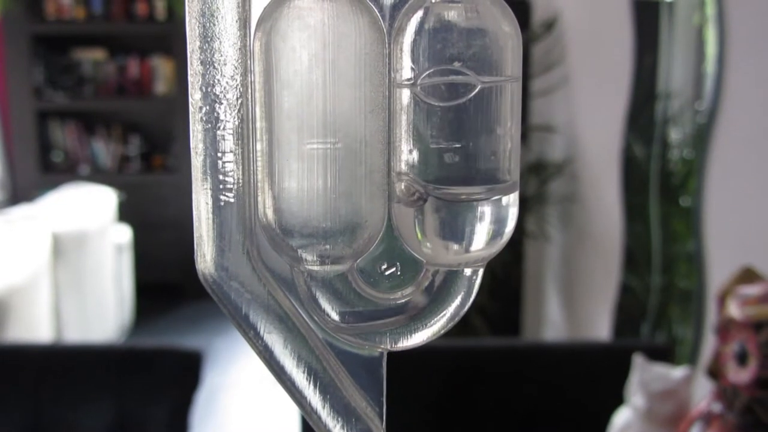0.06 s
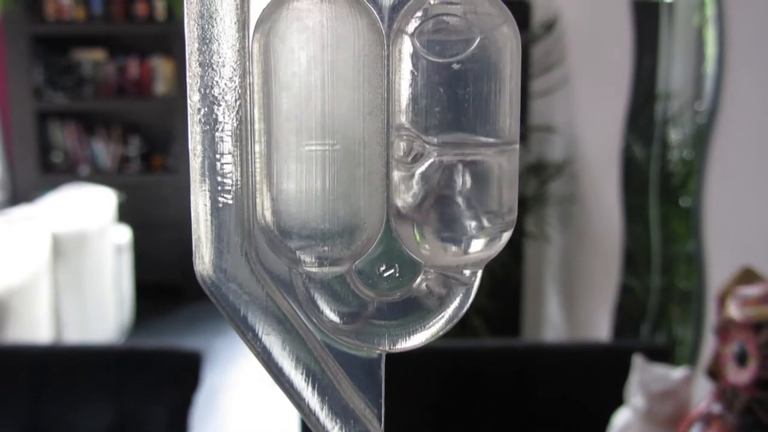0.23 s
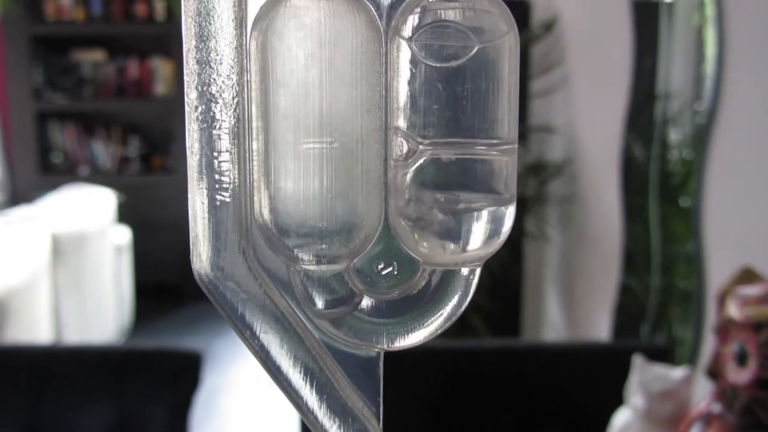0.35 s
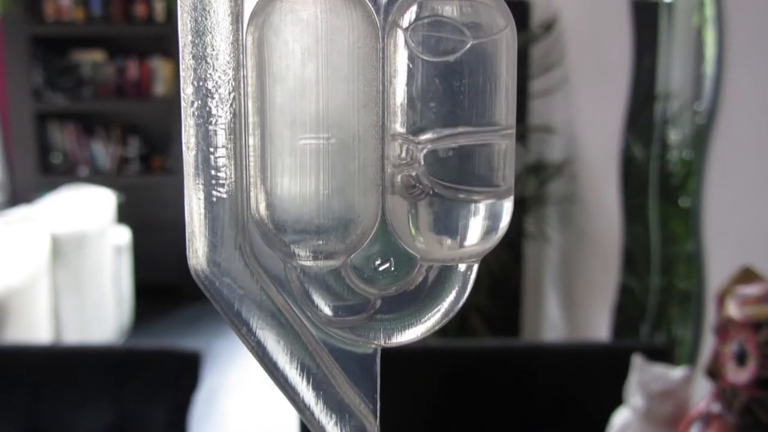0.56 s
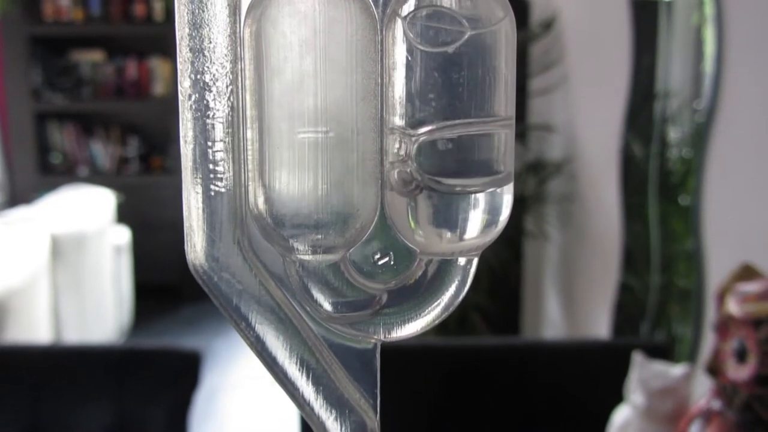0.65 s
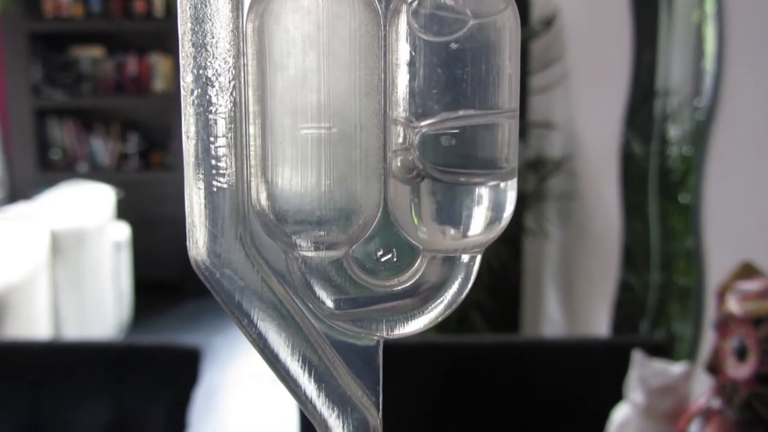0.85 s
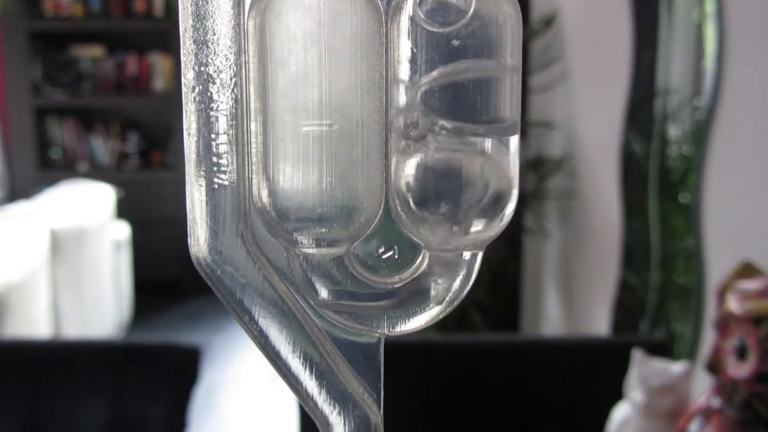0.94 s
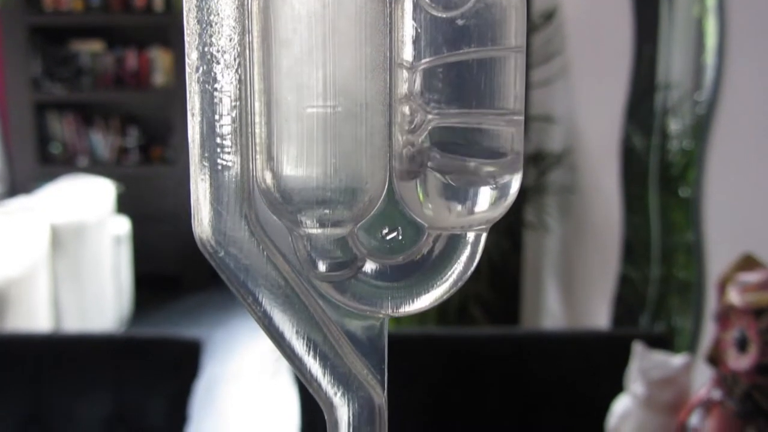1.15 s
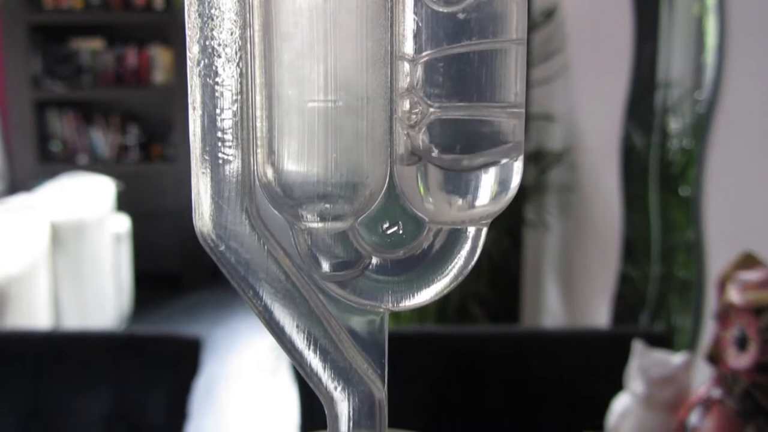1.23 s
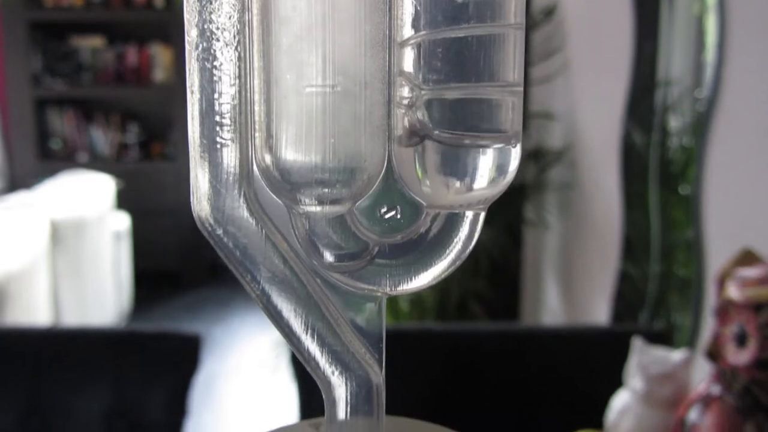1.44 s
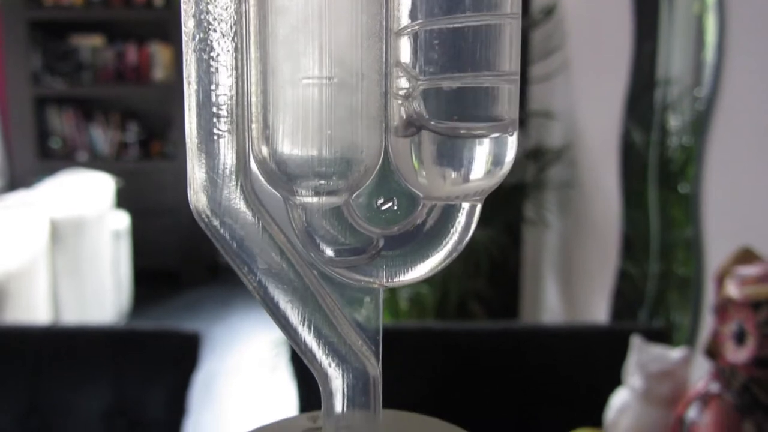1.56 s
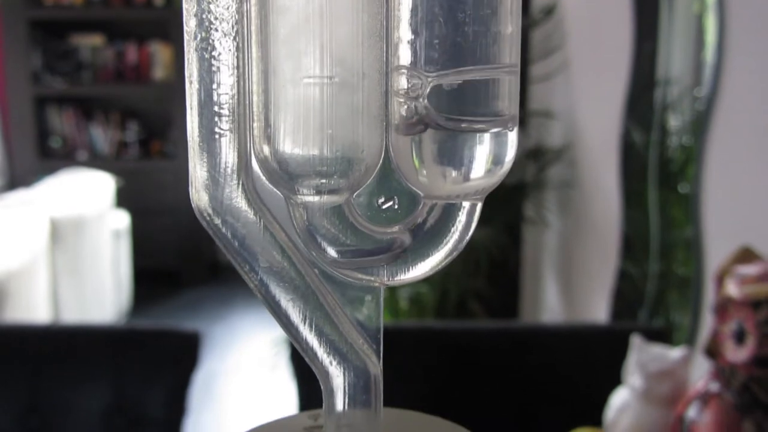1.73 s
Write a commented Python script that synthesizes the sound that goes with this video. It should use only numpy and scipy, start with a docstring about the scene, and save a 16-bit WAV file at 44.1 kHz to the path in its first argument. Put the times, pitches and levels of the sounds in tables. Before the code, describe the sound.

In a quiet living room, a fermentation airlock gives two soft, close bubbling burps, under a second apart. Each ends in small plops and faint ticks of bursting bubbles, with a slight room echo over a low hush.

```python
"""A water-filled plastic airlock on a fermenter burps twice, close by, in a quiet living room.
Each burp is a gulp of gas through the bend, then a higher plop as the bubble surfaces.
Thin films of liquid snap with tiny ticks. Nearby surfaces and the room echo these sounds
over a steady low hush."""
import sys
import numpy as np
from scipy import signal
from scipy.fft import rfft, irfft
from scipy.io import wavfile
from scipy.ndimage import uniform_filter1d

SR = 44100
rng = np.random.default_rng(int(sys.argv[2]) if len(sys.argv) > 2 else 0)


def put_to_file(sound):
    """Save the sound as 16-bit audio at rate SR, in the file named by the first command-line argument."""
    columns = np.atleast_2d(sound).T  # one column per channel
    safe = np.clip(columns, -1, 1)
    whole_steps = np.round(safe * 32767)
    wavfile.write(sys.argv[1], SR, whole_steps.astype(np.int16))


N = 79380  # 1.8 seconds


# Gas slipping through the bend. Each row: start in seconds, level in dB added to its pockets.
GAS_GULPS = [(0.2128, 0), (0.955, -2.5)]
# The gas pockets each gulp breaks into. Each row: delay in seconds, level in dB, pitch in Hz,
# fade time in seconds (the time to fall by 60 dB).
GAS_POCKETS = [(0, -18, 232, 0.046), (.0040, -20.5, 404, 0.065), (.0082, -7, 397, .006)]
# Bubbles surfacing, and at 1.019 s the plastic wall shaken by a bursting film. Each row: start in seconds, #
# level in dB, pitch in Hz, fade time in seconds, phase gap between left and right in radians.
PLOPS = [(0.2290, -27, 325.6, 0.082, 0.27), (0.2404, -14.5, 244, 0.023, .1),
         (0.2403, -16.5, 622, 0.023, 0.14), (0.2245, -31, 685, 0.031, .3), (0.2535, -34, 430, 0.03, 0.6),
         (0.301, -31, 340, 0.032, 0.54), (0.353, -38.5, 202, 0.029, 0.94), (0.6624, -32, 253, 0.015, 0.44),
         (0.9745, -10, 286, 0.0089, .1), (0.9752, -17, 679, .026, 0.14), (0.9752, -21, 803, 0.031, .2),
         (0.9805, -21.5, 412, 0.029, 0.27), (0.983, -21.5, 236, 0.035, 0.36),
         (1.0018, -23, 230, 0.013, 0.22), (1.0023, -43, 718, 0.081, .2), (1.0025, -29.5, 969, 0.031, .4),
         (1.0190, -29.5, 302, 0.033, 0.93), (1.021, -32.5, 905, 0.058, 0.72), (1.1050, -35, 1148, 0.06, .5),
         (1.153, -34, 431, 0.039, 2)]

def airlock_burps():
    """Gulps and plops of gas. The small airlock gives off little bass and its wall muffles the highs."""
    out = np.zeros((2, N))
    for channel, side in zip(out, (.5, -.5)):
        for start, gulp_db in GAS_GULPS:
            for delay, db, hz, fade in GAS_POCKETS:
                add(channel, start + delay, bubble(gulp_db + db, hz, fade, 0))
        for start, db, hz, fade, phase in PLOPS:
            add(channel, start, bubble(db, hz, fade, side * phase))
    bass_cut = signal.butter(2, 110, "high", fs=SR, output="sos")
    return low_pass(signal.sosfilt(bass_cut, out), hz=1110)


def bubble(db, hz, fade, phase):
    """A pocket of gas rings briefly, rising in pitch as it nears the surface."""
    attack_s, rise_per_s = 0.00097, 3.7
    t = np.arange(SR // 10) / SR
    cycles = np.cumsum(hz * (1 + rise_per_s * t)) / SR
    envelope = (1 - np.exp(-(t / attack_s) ** 2)) * die_away(t, fade)
    return amp(db) * envelope * np.sin(2 * np.pi * cycles + phase)


# Films of liquid snapping. Each row: start in seconds, level in dB, centre pitch in Hz,
# width of the noise band in Hz, fade time in seconds.
FILM_SNAPS = [(0.2306, -40, 9040, 2400, .007), (0.239, -49, 5040, 8000, 0.011),
              (0.239, -48, 2920, 1200, .025), (0.9735, -46, 4900, 7840, 0.019),
              (0.9740, -39, 2430, 495, 0.041), (0.9766, -41, 3080, 900, 0.037),
              (1.0171, -20.5, 11420, 1500, 0.0031), (1.0178, -30, 5890, 1480, 0.0044),
              (1.0168, -34.5, 10650, 7200, 0.0083), (1.021, -39, 10700, 1400, 0.0087),
              (1.0190, -43, 1850, 2020, 0.024), (1.147, -46, 2560, 1500, 0.02),
              (1.6863, -48, 5200, 9000, 0.015)]

def film_snaps():
    """A bursting film gives a tiny puff of noise around one pitch."""
    attack_s = 0.00026
    out, t = np.zeros(N), np.arange(SR // 10) / SR
    hz = np.fft.rfftfreq(len(t), 1 / SR)
    for start, db, centre, width, fade in FILM_SNAPS:
        band = 1 / (1 + (2 * (hz - centre) / width) ** 2) ** 2
        noise = irfft(band * np.exp(2j * np.pi * rng.random(len(hz))), len(t))
        envelope = (1 - np.exp(-t / attack_s)) * die_away(t, fade)
        level = amp(db) * np.sqrt(np.mean(envelope ** 2))
        add(out, start, level * unit_level(envelope * noise))
    return out


# Bounces off nearby surfaces. Each row: delay in seconds, strength as a multiplier.
BOUNCES = [(.0041, 0.13), (.0112, 0.13), (.0165, .16)]

def echoes(source):
    """Nearby surfaces send back dull copies that reach the two ears at slightly different times."""
    cutoff_hz, spread_s = 4600, 0.00017
    hz = np.fft.rfftfreq(N, 1 / SR)
    dull = rfft(source) / np.sqrt(1 + (hz / cutoff_hz) ** 2)
    ear_offsets = np.array([[spread_s], [-spread_s]])
    paths = sum(gain * np.exp(-2j * np.pi * hz * (delay + (-1) ** k * ear_offsets))  # sides alternate
                for k, (delay, gain) in enumerate(BOUNCES))
    return irfft(dull * paths, N)


# How long the room rings. Each row: frequency in Hz, fade time in seconds.
ROOM_FADES = [(100, 0.41), (350, 0.61), (900, 0.79), (3000, 0.84), (12000, 0.35)]
# The tone of that ringing. Each row: frequency in Hz, level in dB.
ROOM_TONE = [(60, -19), (200, -9.5), (380, -5), (700, -11.5), (1000, -19), (3000, -14), (11500, -18.5),
             (14000, -38)]

def room(source):
    """Many bounces blur into a short tail, each frequency dying at its own speed."""
    build_s = .012
    hz, t, noise = signal.stft(rng.standard_normal((2, SR // 2)), SR, nperseg=256)
    tail = signal.istft(noise * die_away(t, look_up(ROOM_FADES, hz)[:, None]), SR, nperseg=256)[1]
    tail /= np.linalg.norm(tail[0])
    size = tail.shape[1]
    tone = amp(look_up(ROOM_TONE, np.fft.rfftfreq(size, 1 / SR)))
    t = np.arange(size) / SR
    envelope = (1 - np.exp(-(t / build_s) ** 2)) * (1 - (t / t[-1]) ** 2)
    tail = irfft(rfft(tail) * tone, size) * envelope
    return signal.fftconvolve(source[None], tail, axes=1)[:, :N]


# The tone of the hush. Each row: frequency in Hz, relative level in dB.
HUSH_TONE = [(15, -47), (28, -52), (45, -10), (85, -2), (125, 0.5), (160, -1.5), (280, -4), (450, -6),
             (1000, -12), (1400, -14.5), (2860, -18), (3860, -27), (5200, -24.5), (6500, -26.5),
             (9300, -34.5), (12500, -49), (14000, -75)]
# How alike the two sides are. Each row: frequency in Hz, likeness from -1 (opposite) to 1 (same).
HUSH_SAMENESS = [(30, -0.55), (100, -0.63), (200, -0.57), (400, -0.46), (1000, -0.17), (2500, 0.2),
                 (6000, 0.033), (12000, 0.04)]
# The hush leans slightly left. Each row: frequency in Hz, dB added on the left and taken off the right.
HUSH_LEAN = [(30, 1.3), (100, .5), (400, .35), (2000, -.15), (8000, .2)]

def hush():
    """Steady room rumble and hiss, with faint drifting louder and softer patches."""
    level_db, patch_db = -44, 1.45
    hz = np.fft.rfftfreq(2048, 1 / SR)
    a, b, c, d, patches = rng.standard_normal((N // 512 + 5, len(hz), 5)).T
    patches = uniform_filter1d(patches, size=16, axis=0)  # smooth across frequency
    patches = unit_level(uniform_filter1d(patches, size=6, axis=1))  # then across time
    same = look_up(HUSH_SAMENESS, hz)[:, None]
    left = a + 1j * b
    right = same * left + np.sqrt(1 - same ** 2) * (c + 1j * d)
    lean = amp(look_up(HUSH_LEAN, hz))[:, None]
    tone = amp(look_up(HUSH_TONE, hz)[:, None] + patch_db * patches)
    spectrum = np.array([left * lean, right / lean]) * tone / np.sqrt(1 + same)
    noise = signal.istft(spectrum, nperseg=2048, noverlap=1536)[1][:, :N]
    return amp(level_db) * unit_level(low_pass(noise, hz=12800))


def amp(db):
    """Turns decibels into a multiplier."""
    return 10 ** (np.asarray(db) / 20)


def die_away(t, fade):
    """A curve that falls by 60 dB in `fade` seconds."""
    return np.exp(-np.log(1000) * t / fade)


def unit_level(x):
    """Scales a signal so its average (rms) level is 1."""
    return x / np.sqrt(np.mean(x ** 2) + 1e-20)


def look_up(table, hz):
    """Reads between a table's rows, with frequency spaced in octaves."""
    row_hz, value = np.transpose(table)
    return np.interp(np.log(hz + 1), np.log(row_hz + 1), value)


def add(mix, start, sound):
    """Mixes a sound in at `start` seconds."""
    part = mix[round(start * SR):][:len(sound)]
    part += sound[:len(part)]


def low_pass(x, hz):
    """Cuts the highs above `hz` on both channels."""
    kernel = signal.firwin(255, hz, window=("kaiser", 8), fs=SR)
    return signal.oaconvolve(x, kernel[None], "same", axes=1)


def scene():
    """The airlock slightly left of centre, its echoes, the room and the hush."""
    burp_left_db, snap_left_db, snap_lag_s = .6, 1.2, .000016
    burps, snaps = airlock_burps(), film_snaps()
    lag = np.exp(-2j * np.pi * np.fft.rfftfreq(N, 1 / SR) * snap_lag_s)
    right_snaps = irfft(rfft(snaps) * lag, N)  # the snaps reach the right side later
    direct = burps * amp([[burp_left_db], [-burp_left_db]])
    direct += np.array([snaps, right_snaps]) * amp([[snap_left_db], [-snap_left_db]])
    source = burps.mean(0) + snaps
    return direct + echoes(source) + room(source) + hush()


def record(dry):
    """Trims off the very highest treble."""
    return low_pass(dry, hz=14400)


dry = scene()
out = record(dry)
put_to_file(out)
```